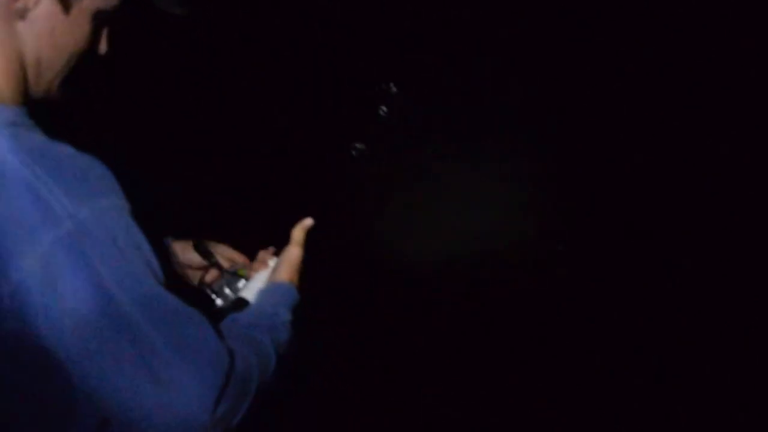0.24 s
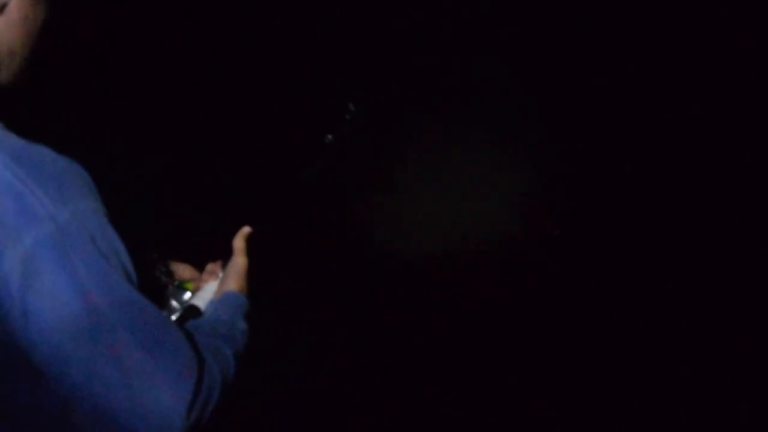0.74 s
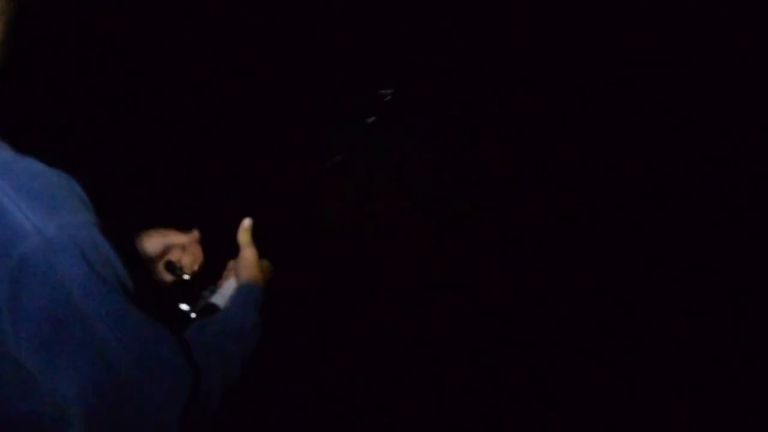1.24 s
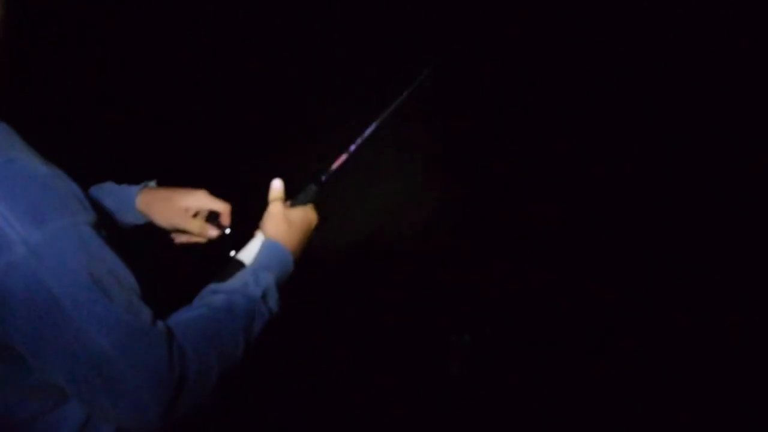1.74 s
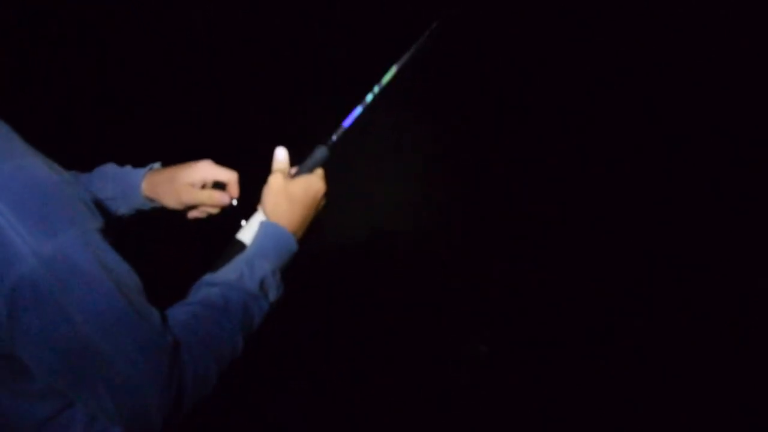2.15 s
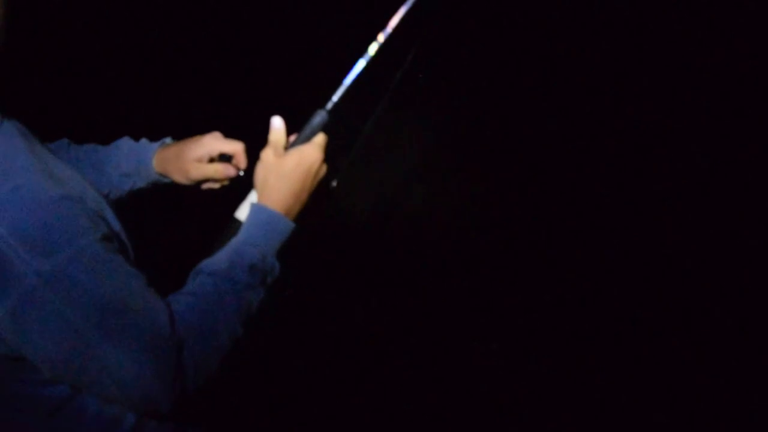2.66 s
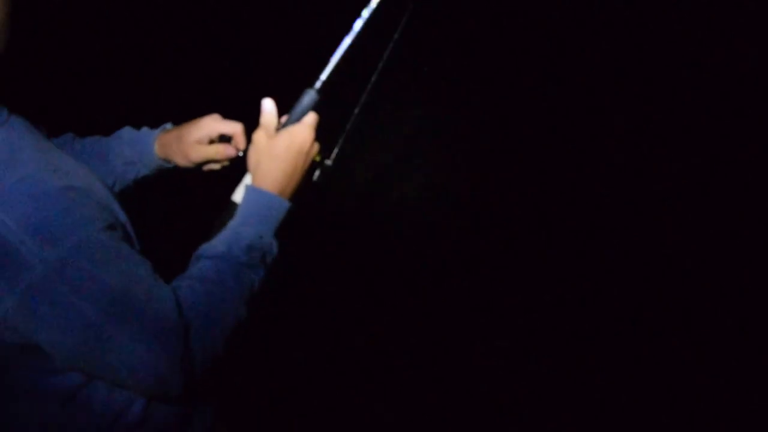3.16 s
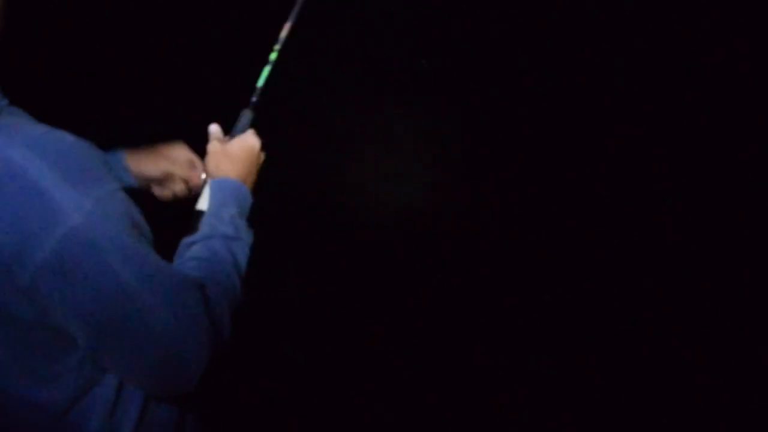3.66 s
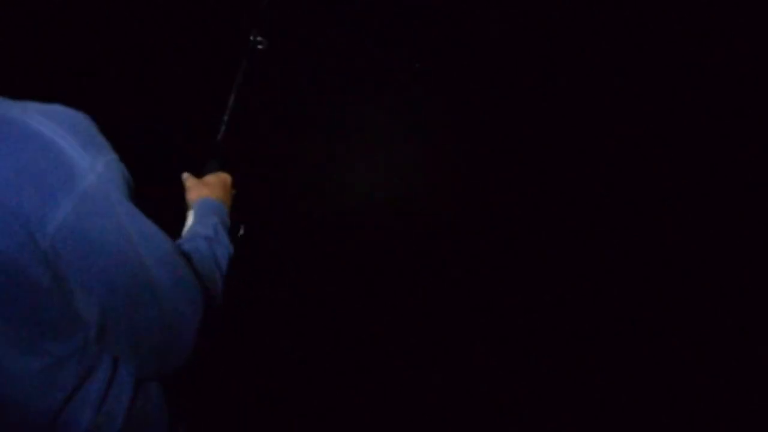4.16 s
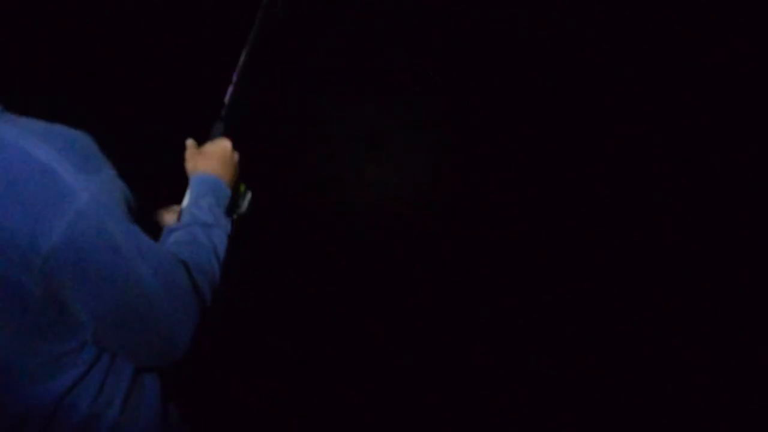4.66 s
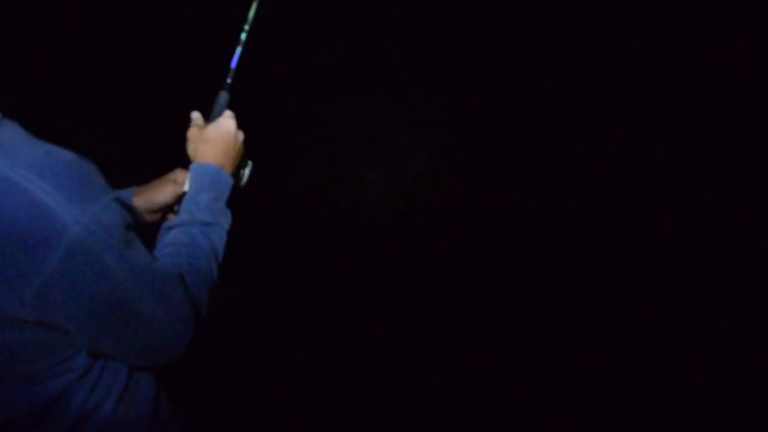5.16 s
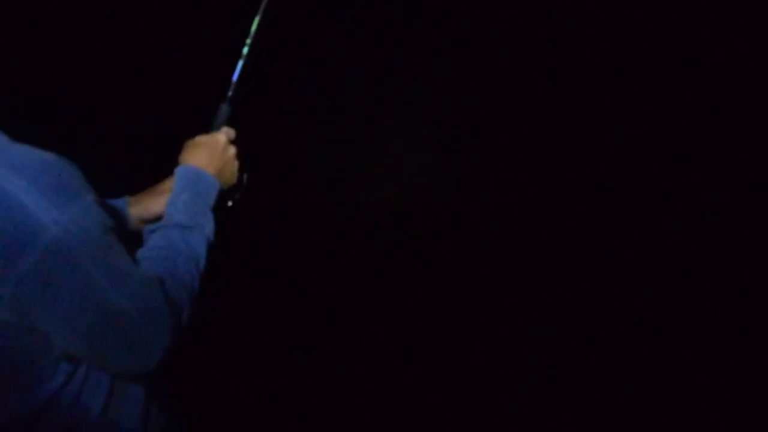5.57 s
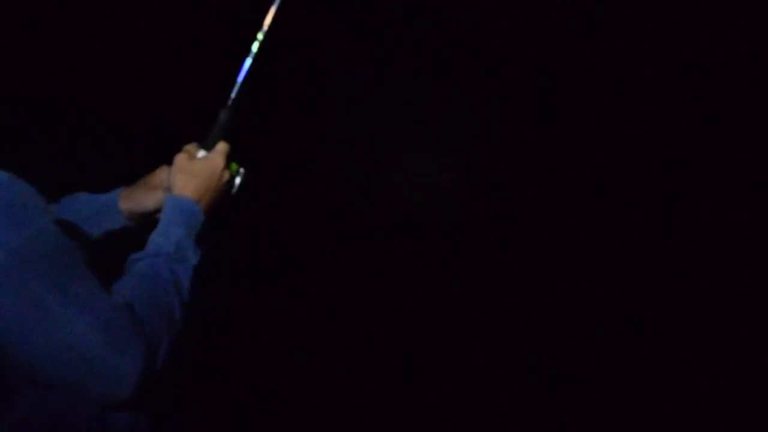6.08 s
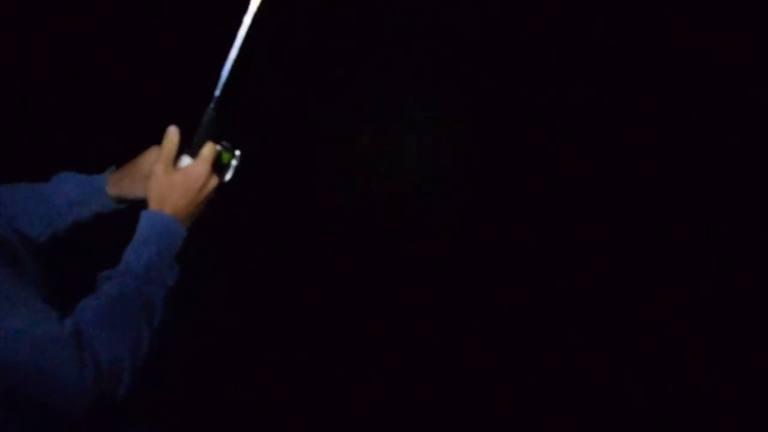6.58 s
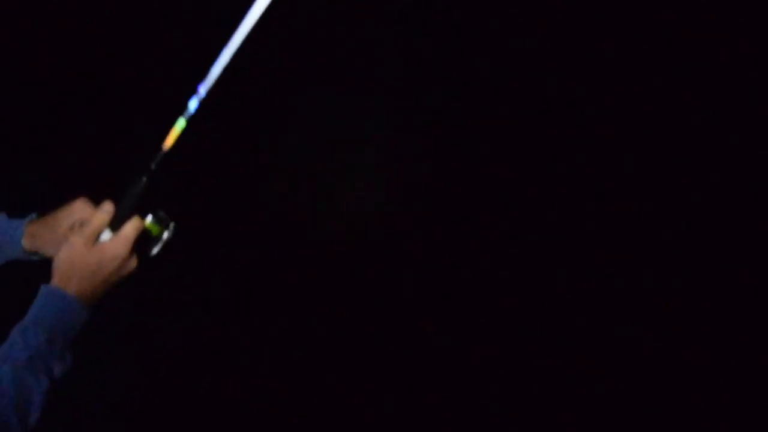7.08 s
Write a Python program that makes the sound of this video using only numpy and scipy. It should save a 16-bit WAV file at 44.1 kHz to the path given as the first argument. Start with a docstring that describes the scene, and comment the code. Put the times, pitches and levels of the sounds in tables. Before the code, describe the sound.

A fishing reel's ratchet trills in short, bright, insect-like bursts over steady outdoor hiss and a low distant engine hum, with sharp snaps and small knocks.

```python
"""The ratchet of a spinning reel trills like an insect in short runs as a hand turns it, fishing at night.
Each tooth rings a spring of damped modes and ticks a pawl; a band of noise makes the rub of the gears.
The tackle snaps six times and is knocked now and then, in short modal bursts; soft thuds are deep noise.
A far engine hums in sines and slowly sinks in pitch, under faint wavering drones.
Coloured noise makes a steady outdoor rush and hiss."""
import sys
import numpy as np
from scipy import signal
from scipy.fft import rfft, irfft, next_fast_len
from scipy.io import wavfile
from scipy.ndimage import map_coordinates

SR = 44100
rng = np.random.default_rng(int(sys.argv[2]) if len(sys.argv) > 2 else 0)


def waveform_to_disk(signal):
    """Save audio, clipped to [-1, 1], as 16-bit WAV at the path in sys.argv[1]."""
    frames = np.transpose(np.atleast_2d(signal))
    scaled = np.clip(frames, -1, 1) * 32767
    samples = np.round(scaled).astype(np.int16)
    wavfile.write(sys.argv[1], SR, samples)


N = 323253  # length in samples

# All levels and colours in dB are relative: layers trim or vary them as they are mixed.

# Far engine. Each row: time in seconds, mean firing rate in Hz, second order in dB, third order in dB.
ENGINE = [(0.0, 45.76, -25, -35.5), (0.35, 45.2, -30.5, -37.5), (0.7, 44.7, -29, -31),
          (1.3, 44.26, -31.5, -29.5), (1.8, 44.07, -30, -30.6), (2.3, 43.85, -37.5, -34),
          (2.8, 43.58, -38, -42.5), (3.3, 43.33, -38, -34), (3.6, 43.43, -35.5, -35),
          (4.1, 43.36, -33.5, -32.1), (5.05, 43, -33.5, -31.0), (5.6, 43.09, -33.0, -34.2),
          (6.3, 43, -31, -34.5), (7.0, 42.59, -33.3, -36.5), (7.33, 42.8, -31.3, -35)]

# Swell of the far rush, used as departures from its mean. Each row: time in seconds, level in dB.
RUSH_SWELL = [(0.1, -31.5), (0.6, -31.5), (3.09, -33.5), (4.64, -31.5), (4.72, -31.5), (5.61, -31),
              (7.25, -27.5)]
# Colours of the four layers of the rush and of the hiss. Each row: frequency in Hz, density in dB per Hz.
RUSH_LOW = [(15, -40), (30, -16), (46, -8), (64, 2), (100, 2), (170, 2), (220, 0), (290, -0.5), (400, -6.5),
            (600, -38)]
RUSH_BODY = [(220, -32), (340, -7), (430, 1.5), (560, 1), (720, 0.5), (850, -5), (1050, -34.5), (1500, -45)]
RUSH_MIDDLE = [(500, -24), (720, -17.5), (880, 3), (1000, 1.5), (1200, -0.5), (1500, -2), (1800, -8.5),
               (2200, -18), (3200, -55)]
RUSH_UPPER = [(1200, -16), (1900, 5.5), (2600, 4.5), (3500, -0.5), (4500, -13.5), (6500, -16.5),
              (10000, -53)]
HISS = [(1500, -38), (4000, 10), (6500, 4.5), (9000, 3.5), (15600, 2.5), (16000, -20)]
# Colour of the hiss that differs between the ears. Each row: frequency in Hz, density in dB per Hz.
SIDE_HISS = [(700, -26), (2500, -22), (4500, 0), (6000, 12.5), (15600, 11.5), (16000, -20)]

# Modes of the free spring beside its main pitch. Each row: frequency in Hz, level in dB, 60 dB decay in seconds.
SPRING = [(3050, -20, .012), (3650, -17, .012), (4820, -9, .016), (5200, -19.5, .18), (5600, -13, .006)]
# Modes of the pawl. Each row: frequency in Hz, level in dB, 60 dB decay in seconds.
PAWL = [(8060, -16.5, 0.024), (9620, -16, 0.065), (12700, -17, .01), (13200, -8, 0.0091),
        (14100, -8, 0.012)]
# Colour of the pawl's dry crack. Each row: frequency in Hz, density in dB per Hz.
CRACK = [(1200, -17), (2800, -5.5), (4500, -4.5), (6000, -2), (7000, -11), (8500, -4), (11000, 1),
         (12700, -1.5), (14500, -4), (16000, -15)]
# Single teeth the wheel slips on by. Each row: start in seconds, spring ring in dB, tick in dB, grip from 0 to 1.
SLIPS = [(0.035, -39.5, -39.5, 0.1), (.082, -48, -44, 0.2), (0.399, -46, -46, 0.4), (1.4247, -38, -37, 0.5),
         (1.6699, -46, -37.5, 0.4), (1.9725, -34, -43, 0.4), (2.9331, -30, -33, 0.02),
         (3.172, -29.5, -37, 0), (3.2858, -33.5, -34, 0.02), (3.5938, -35, -42, 0.08),
         (3.802, -40, -45, .1), (3.863, -38, -44, .1), (3.978, -39, -42, 0.17), (4.4068, -37.5, -40, 0.84),
         (5.095, -42, -46, .8), (5.3232, -40.5, -42, 0.82), (5.393, -44, -46, .5), (6.633, -38, -39, .8),
         (6.6397, -54, -42, .5), (6.699, -38, -36, 0.73), (6.714, -46, -42, 0.96), (6.7345, -34, -37, 0.8),
         (6.762, -32, -32, .9), (6.7871, -30, -30, 1), (6.9575, -37, -38, 0.65), (6.965, -41, -38, .8)]
# Strokes of the hand on the reel. Each row: first tooth in seconds, last tooth in seconds, teeth passed (rounded
# when played), fastest point as a share of the stroke, speed gained there over the starting speed as a ratio,
# spring ring in dB, tick in dB, gear rub in dB, grip at the start from 0 to 1, grip at the end from 0 to 1.
STROKES = [ (1.445, 1.6377, 23, 0.33, 0.69, -34, -37, -48.5, 0.14, .3),
           (1.9937, 2.3205, 29, .11, 2.11, -32.5, -39, -50, 0.12, 0.06),
           (2.342, 2.5165, 15, .65, 1.04, -32.5, -40, -47.5, 0.1, 0.2),
           (2.5265, 2.9, 31.7, 0.56, 1.3, -32, -38.5, -45, 0.1, .2),
           (3.308, 3.5745, 35, 0.86, 1.67, -32.5, -34.5, -45.5, 0.13, 0.74),
           (4.0375, 4.365, 43, .4, 3.1, -33.5, -39, -50, 0.33, 0.72),
           (4.7675, 5.077, 17, 0.9, .55, -38.5, -36.5, -59, 0.55, 0.76),
           (6.8076, 6.9406, 10.2, 0.5, 0.78, -30, -32.5, -42.5, 0.9, 0.53)]

# Sharp snaps of the tackle. Each row: start in seconds, level in dB, weight of the modes under 8 kHz in dB.
SNAPS = [(0.878, -8.5, 1.5), (0.9137, -10, 2), (0.956, -8.5, 2), (0.99, -8, 4), (1.0212, -7, 0),
         (1.071, -4, -2.5)]
# What a snap rings with. Each row: frequency in Hz, level in dB, 60 dB decay in seconds.
SNAP_MODES = [(2640, -21, 0.015), (3770, -13.5, 0.011), (3960, -10, 0.006), (5070, -8, 0.0047),
              (6600, -11, 0.0065), (7530, -13, 0.0081), (9000, -4.5, 0.005), (11200, -8, 0.0063),
              (12400, -9, 0.0049), (15600, 2.5, 0.0043)]

# Faint higher drones. Each row: loudest moment in seconds, half length in seconds, mean pitch in Hz, level in dB.
DRONES = [(2.4, 1, 233.2, -47.5), (4.701, 0.53, 274.4, -43), (5.35, 1, 235.6, -41.5),
          (6.901, 0.59, 237.4, -51)]

# Knocks on rod and reel. Each row: start in seconds, peak in dB, centre in Hz, scuff beside the ring from 0 to 1.
KNOCKS = [(1.3294, -26, 2816, 0.97), (1.3628, -29, 2400, .6), (2.511, -26, 4500, .4),
          (2.57, -25, 2800, 0.8), (2.8997, -22.5, 4020, .5), (3.2131, -23.5, 1400, 0.2),
          (3.412, -17.5, 1495, 0.5), (3.5014, -21, 3300, .9), (3.772, -34, 3650, 0), (3.812, -33, 3200, 0),
          (4.5345, -16.5, 2830, 0.44), (4.5446, -21, 2080, 0.2), (4.6533, -26, 4200, 0.8),
          (5.3855, -26, 2980, 0.82), (6.1589, -21, 2480, 0.06), (6.322, -28, 2928, .27),
          (6.9648, -24.5, 2602, .1), (6.983, -25, 2900, .3)]
# Modes of the reel body. Each row: frequency in Hz, level in dB, 60 dB decay in seconds.
BODY = [(1452, 10, 0.019), (1893, -1, 0.036), (2470, -2.5, 0.01), (3120, -8, 0.02), (3710, -3, 0.023),
        (4260, -6, 0.031), (5020, 9.5, 0.0076), (6570, 5.5, 0.0092)]
# Colours of the scuff and of the gears' rub. Each row: frequency in Hz, density in dB per Hz.
SCUFF = [(800, -13), (2000, 10), (4000, 4.5), (6500, -11), (12000, -11)]
GEAR_RUB = [(900, -26), (1500, -13), (2300, -8), (3100, -7), (4000, -4.5),
            (4700, -10), (6300, -7.0), (8000, -21.5), (12000, -16)]

# Handling bumps on the microphone. Each row: start in seconds, level in dB.
BUMPS = [(5.39, -30), (5.68, -37), (6.16, -35), (7.15, -37)]
# Colour of a bump. Each row: frequency in Hz, density in dB per Hz.
BUMP_COLOUR = [(8, -26), (18, -12), (30, 34), (45, 22), (70, -19), (160, -55.0)]

SPRING_HZ, SPRING_SAG_HZ = 5080, 200  # main pitch of the free spring, and its fall under a full grip
TICK_HZ, TICK_RISE_HZ, TICK_SINK_HZ = 10920, 900, 3300  # rises with grip, sinks late in a tightening stroke
TOOTH_LUCK_DB = 1.0  # no two teeth drop equally hard
ACCENT_DB = 1.8  # the hand's pressure wavers
TOOTH_SCATTER_S = .0003  # the teeth are not quite evenly spaced
SLOW_SPRING_DB, SLOW_TICK_DB = -1.5, -1.5  # the pawl drops more softly at the slow ends of a stroke
ONSET_DB, ONSET_S = -1, 0.0098  # how much fainter a stroke begins, and the time constant of its recovery
RUB_FADE_S = 0.027  # the gears' rub swells and fades in this time
TOP_HZ = 16000  # middle of the slope at the top of the band


def amp(db):
    """Turn decibels into gain."""
    return 10 ** (np.asarray(db) / 20)


def unit(x):
    """Scale to rms 1."""
    return x / np.sqrt(np.mean(x ** 2) + 1e-20)


def curves(rows):
    """Draw each column after the time as a curve over every sample."""
    s, *columns = np.transpose(rows)
    return [np.interp(np.arange(N) / SR, s, column) for column in columns]


def wobble(rate):
    """Drift along a smooth random curve with rate knots a second."""
    knots = rng.standard_normal(int(N * rate / SR) + 4)
    return map_coordinates(knots, [np.arange(N) * rate / SR])


def filtered(x, response):
    """Shape the spectrum of x by a gain that depends on frequency."""
    size = next_fast_len(N + SR // 4)
    spectrum = rfft(x, size) * response(np.fft.rfftfreq(size, 1 / SR))
    return irfft(spectrum, size)[..., :N]


def noise(colour):
    """Colour white noise by a spectral curve and bring it to rms 1."""
    f, db = np.transpose(colour)
    white = rng.standard_normal(N)
    return unit(filtered(white, lambda hz: amp(np.interp(np.log(hz + 1), np.log(f), db))))


def strike(x):
    """Scale a blow so that its first 3 ms have rms 1."""
    return x / np.sqrt(np.mean(x[:SR * 3 // 1000] ** 2) + 1e-20)


def ring(modes, scatter_db, detune, size=6000):
    """Sum damped modes, struck at new strengths; heavily damped ones stray most in pitch."""
    hz, db, t60 = np.transpose(modes)[:, :, None]
    t = np.arange(size) / SR
    luck, stray = rng.standard_normal((2, len(modes), 1))
    sign = (-1) ** np.arange(len(modes))[:, None]
    wave = sign * np.sin(2 * np.pi * (hz + detune * stray / t60) * t)
    decay = np.exp(-np.log(1000) * t / t60)
    return np.sum(amp(db + scatter_db * luck) * decay * wave, 0)


def add(track, s, sound):
    """Mix a sound into a track at time s."""
    part = track[max(round(s * SR), 0):][:len(sound)]
    part += sound[:len(part)]


def engine():
    """A far engine hums by its second and third orders, sines at multiples of a wavering firing rate."""
    firing_hz, *levels = curves(ENGINE)
    turn = 2 * np.pi * np.cumsum(firing_hz + .15 * wobble(5)) / SR
    hum = np.zeros(N)
    for order, level_db in enumerate(levels, 2):
        hum += amp(level_db + 0.93 * wobble(12)) * np.sin(order * turn)
    return np.sqrt(2) * hum


def night_air():
    """A far, dull rush whose layers all follow one slow swell, with a smooth hiss above it."""
    rush_db, = curves(RUSH_SWELL)
    swell_db = rush_db - rush_db.mean()
    low = amp(-35.5 + 0.51 * swell_db + 0.94 * wobble(10.0)) * noise(RUSH_LOW)
    body = amp(-36.0 + 1.25 * swell_db + 0.14 * wobble(3.7)) * noise(RUSH_BODY)
    middle = amp(-36.0 + 0.73 * swell_db + 0.9 * wobble(7.6)) * noise(RUSH_MIDDLE)
    upper = amp(-49.0 + 1.57 * swell_db + 0.18 * wobble(9.9)) * noise(RUSH_UPPER)
    hiss = amp(-52.0) * noise(HISS)
    return low + body + middle + upper + hiss


def side_hiss():
    """A very faint high hiss, to be heard with opposite sign in the two ears."""
    return amp(-60.0) * noise(SIDE_HISS)


def ratchet():
    """Every tooth rings the spring and ticks the pawl; a firm grip damps both and lowers the spring's pitch."""
    out, t = np.zeros(N), np.arange(SR // 7) / SR
    grit, pressure_db = noise(CRACK), ACCENT_DB * wobble(35)
    teeth = [(*slip, 0) for slip in SLIPS]
    for row in STROKES:
        teeth.extend(stroke(*row))
    for s, spring_db, tick_db, grip, sink_hz in teeth:
        grip = np.clip(grip, 0, 1)
        spring_luck, tick_luck = TOOTH_LUCK_DB * rng.standard_normal(2)
        # the hand's losses add to the spring's own, so its longest ring suffers most
        held = [(hz, db, 1 / (1 / t60 + 1.9 * grip)) for hz, db, t60 in SPRING]
        main = (SPRING_HZ - SPRING_SAG_HZ * grip, 0, .025 - 0.0079 * grip)
        spring = strike(ring([main] + held, scatter_db=2.5, detune=1.34))
        add(out, s, amp(spring_db + 1.5 + pressure_db[round(s * SR)] + spring_luck) * spring)
        # the pawl's tick shortens and turns into a dry crack
        tip = (TICK_HZ + TICK_RISE_HZ * grip - sink_hz, 1 + 5 * grip, 0.017 * amp(-11 * grip))
        pawl = strike(ring([tip] + PAWL, scatter_db=4.5, detune=1.1, size=len(t)))
        crack_fade = np.exp(-t / 0.0012) + 0.093 * np.exp(-t / 0.0015)
        crack = strike(grit[round(s * SR):][:len(t)] * crack_fade)
        dryness = np.clip(0.34 + 0.85 * grip, 0, 1)
        tick = np.sqrt(1 - dryness) * pawl + np.sqrt(dryness) * crack
        add(out, s, amp(tick_db + 0.5 + 0.82 * tick_luck) * tick)
    return out


def stroke(first_s, last_s, teeth, fastest, spurt, spring_db, tick_db, rub_db, grip_from, grip_to):
    """The wheel speeds up and slows again, giving each tooth its time, spring dB, tick dB, grip and tick sink Hz."""
    along = np.linspace(0, 1, 200)
    ramp = np.interp(along, [0, np.clip(fastest, .05, .95), 1], [0, 1, 0])
    push = np.sin(np.pi / 2 * ramp) ** 1.5
    speed = 1 + spurt * push
    turned = np.cumsum(speed) - (speed + speed[0]) / 2
    # teeth lie evenly round the wheel; u is the share of the stroke's time when each one passes
    u = np.interp(np.linspace(0, 1, round(teeth)), turned / turned[-1], along)
    slow = 1 - np.interp(u, along, push)
    since_first_s = (last_s - first_s) * u
    s = first_s + since_first_s + TOOTH_SCATTER_S * rng.standard_normal(len(u))
    tighten = grip_to - grip_from
    # the first teeth are faint, until the wheel is under way
    onset_db = ONSET_DB * np.exp(-since_first_s / ONSET_S)
    spring_levels = spring_db + onset_db + SLOW_SPRING_DB * slow
    tick_levels = tick_db + onset_db / 2 + SLOW_TICK_DB * slow
    return np.transpose([s, spring_levels, tick_levels, grip_from + tighten * u, TICK_SINK_HZ * tighten * u ** 3])


def near_echo(x):
    """A rough surface about a metre away returns a faint copy, smeared by a short burst of noise."""
    t = np.arange(SR // 50) / SR
    response = rng.standard_normal(len(t)) * np.exp(-((t - .006) / 0.0012) ** 2)
    return signal.fftconvolve(x, response / np.linalg.norm(response))[:N]


def snaps():
    """The tackle snaps: very short, bright bursts of damped modes."""
    out = np.zeros(N)
    for s, db, low_db in SNAPS:
        modes = [(hz, level + low_db * (hz < 8000), t60) for hz, level, t60 in SNAP_MODES]
        snap = strike(ring(modes, scatter_db=2.5, detune=.6))
        add(out, s + 0.00053, amp(db - 12.0) * snap)
    return out


def drone():
    """Faint, wavering tones above the engine, each swelling and fading."""
    t, out = np.arange(N) / SR, np.zeros(N)
    for s, half_s, hz, db in DRONES:
        turn = 2 * np.pi * np.cumsum(hz + 3 * wobble(8)) / SR
        swell = np.exp(-((t - s) / half_s) ** 2)
        out += amp(db + 2.1 * wobble(5.2)) * swell * np.sin(turn)
    return np.sqrt(2) * out


def knocks():
    """Fingers knock the reel body; a clean tap rings the modes near its own centre, a scuff rings them all."""
    out, t = np.zeros(N), np.arange(SR // 20) / SR
    scuff = noise(SCUFF)
    for s, db, centre_hz, scuff_share in KNOCKS:
        focus_db = 90 * amp(-32 * scuff_share)  # loss one octave away from the centre
        modes = [(hz, level - focus_db * np.log2(hz / centre_hz) ** 2, t60) for hz, level, t60 in BODY]
        tap = strike(ring(modes, scatter_db=1.5, detune=.9, size=len(t)))
        scrape = strike(np.exp(-t / 0.0073) * scuff[round(s * SR):][:len(t)])
        knock = tap + scuff_share * scrape
        add(out, s, amp(db + 1.5) * knock / np.abs(knock).max())
    return out


def gears():
    """The gears give a gritty rub of fluttering noise that lasts as long as each stroke."""
    t, turning = np.arange(N) / SR, np.zeros(N)
    for first_s, last_s, *_, rub_db, grip_from, grip_to in STROKES:
        inside_s = np.minimum(t - first_s, last_s - t)
        turning += amp(rub_db) * np.clip(inside_s / RUB_FADE_S + .5, 0, 1)
    return turning * unit(noise(GEAR_RUB) * amp(4.2 * wobble(300)))


def bumps():
    """Soft deep thuds of low noise as the microphone is moved."""
    swell, t = np.zeros(N), np.arange(SR // 2) / SR
    thud = (1 - np.exp(-t / .006)) * np.exp(-t / .11)
    for s, db in BUMPS:
        add(swell, s, amp(db) * thud)
    return swell * noise(BUMP_COLOUR)


def scene():
    """Everything arrives in the middle; only the high hiss differs between the ears."""
    reel = ratchet() + gears() + snaps() + knocks()
    echo = amp(-13.0) * near_echo(reel)
    mid = reel + echo + engine() + drone() + night_air() + bumps()
    side = side_hiss()
    return np.array([mid + side, mid - side])


def record(dry):
    """A steep slope takes away everything above about 16 kHz."""
    return filtered(dry, lambda hz: np.clip((TOP_HZ - hz) / 800 + .5, 0, 1) ** 2)


dry = scene()
out = record(dry)
waveform_to_disk(out)
```